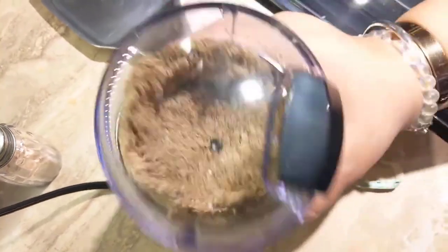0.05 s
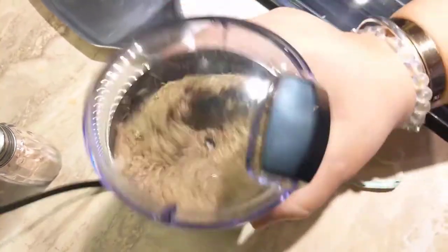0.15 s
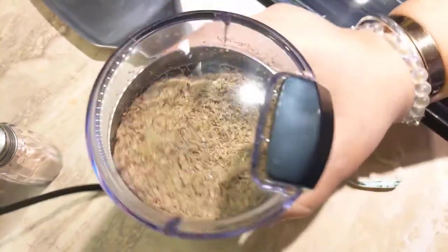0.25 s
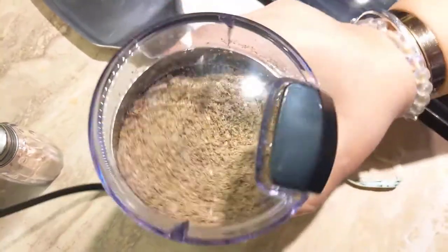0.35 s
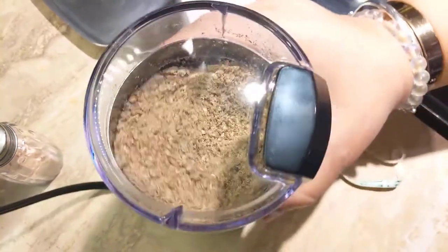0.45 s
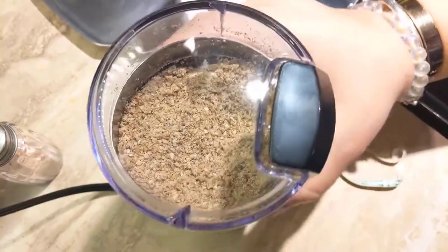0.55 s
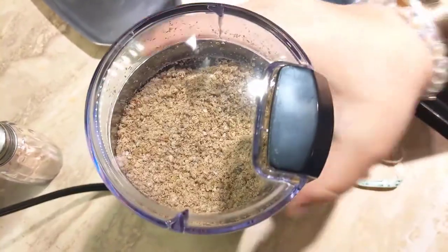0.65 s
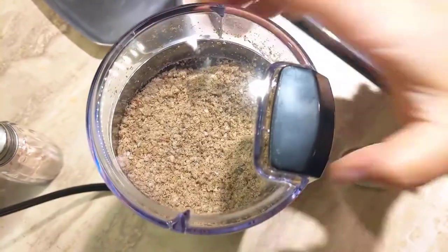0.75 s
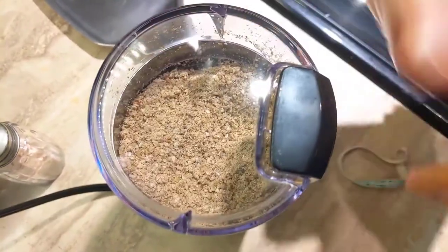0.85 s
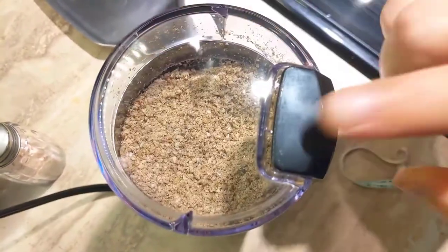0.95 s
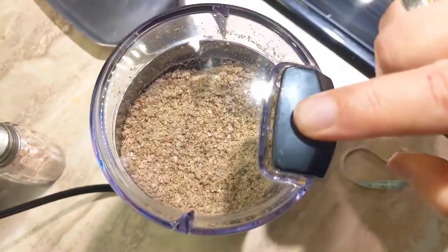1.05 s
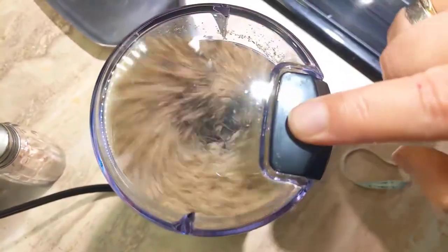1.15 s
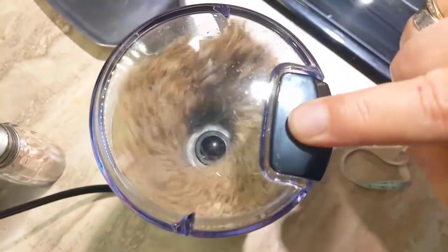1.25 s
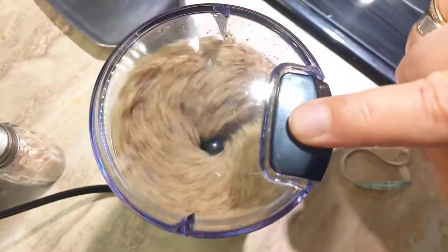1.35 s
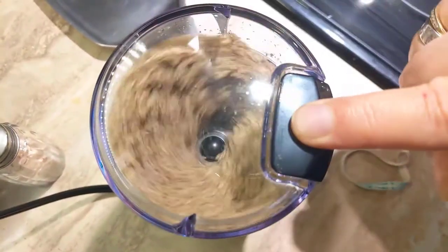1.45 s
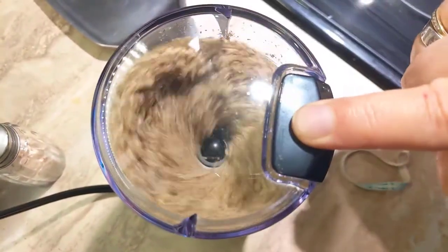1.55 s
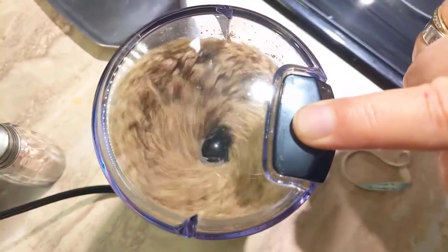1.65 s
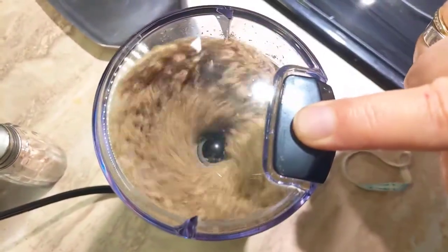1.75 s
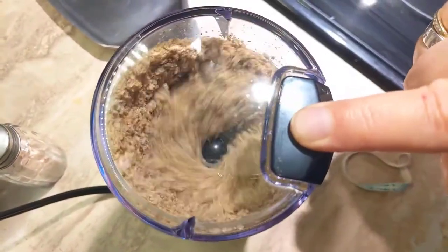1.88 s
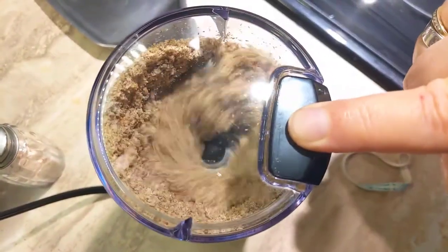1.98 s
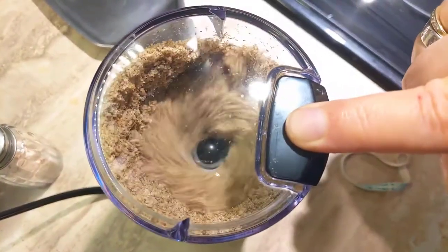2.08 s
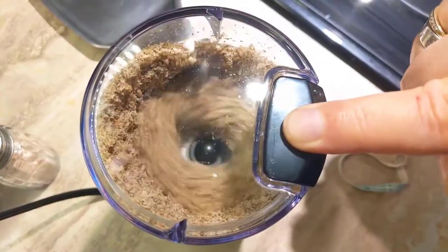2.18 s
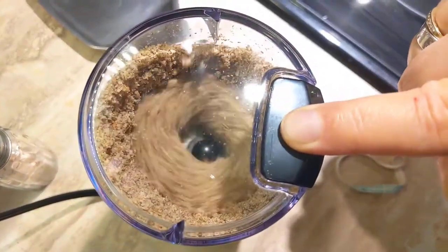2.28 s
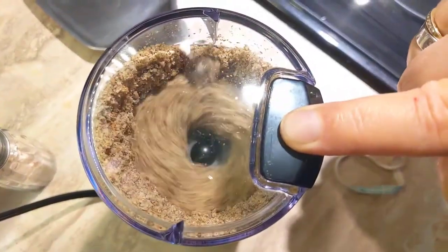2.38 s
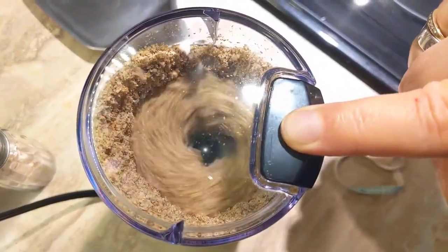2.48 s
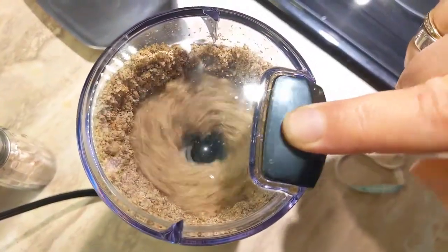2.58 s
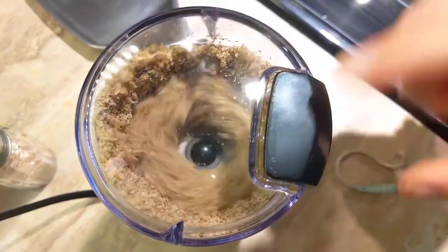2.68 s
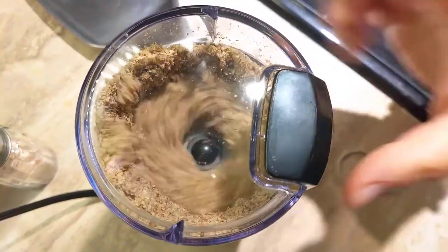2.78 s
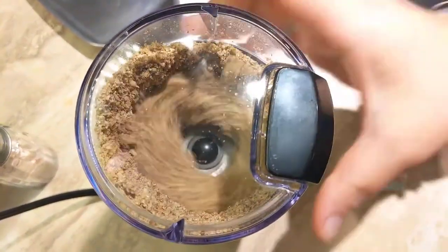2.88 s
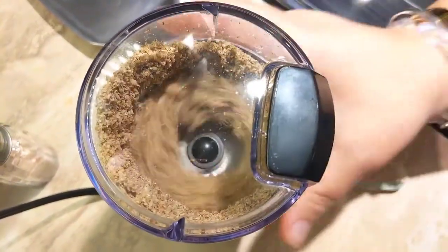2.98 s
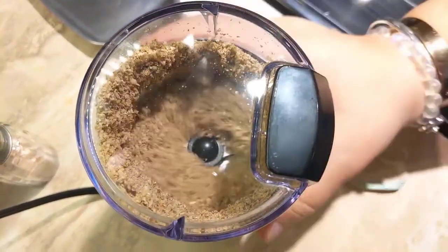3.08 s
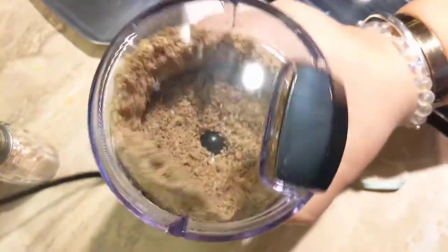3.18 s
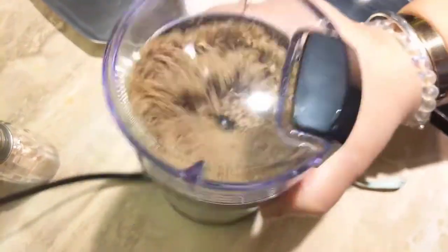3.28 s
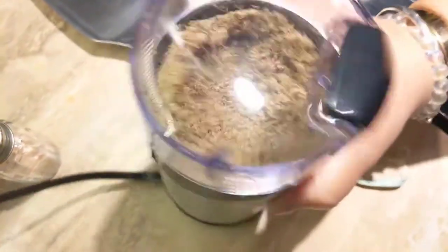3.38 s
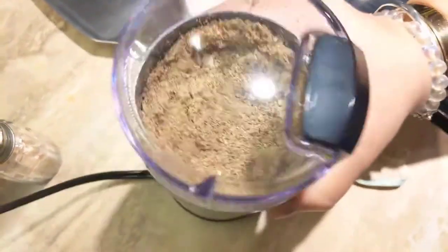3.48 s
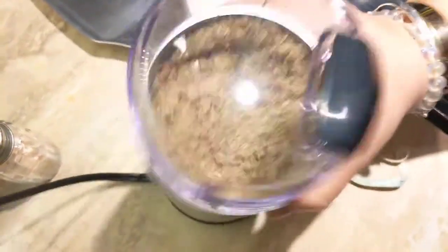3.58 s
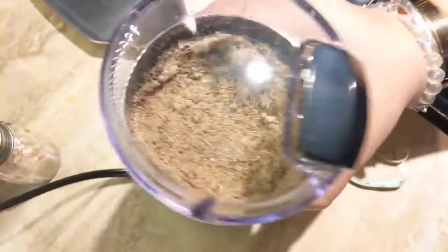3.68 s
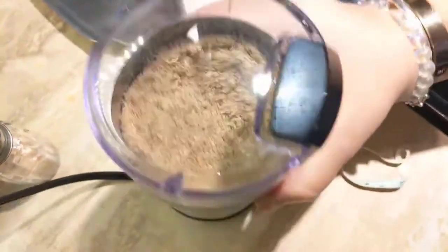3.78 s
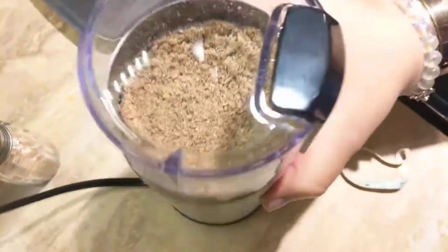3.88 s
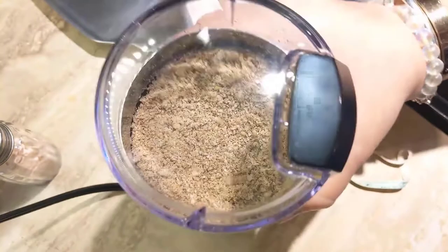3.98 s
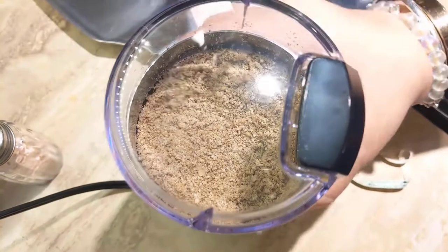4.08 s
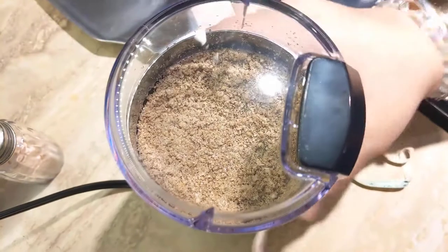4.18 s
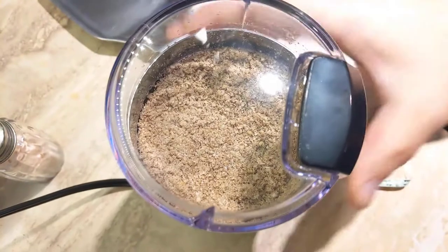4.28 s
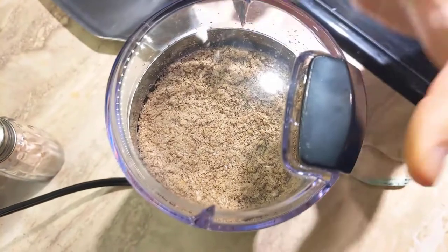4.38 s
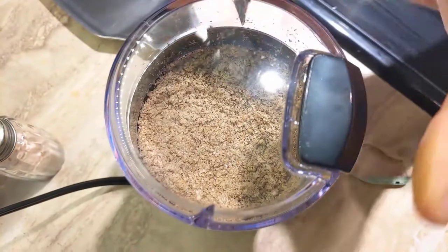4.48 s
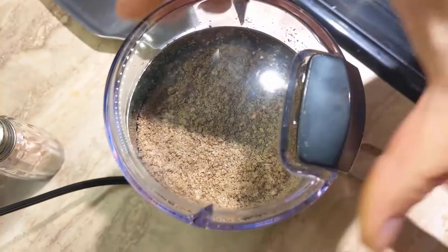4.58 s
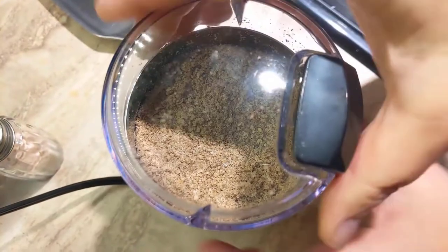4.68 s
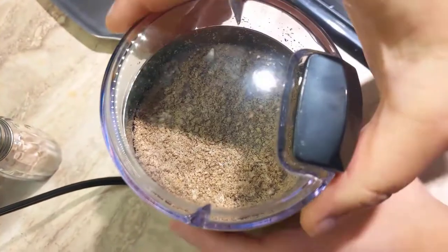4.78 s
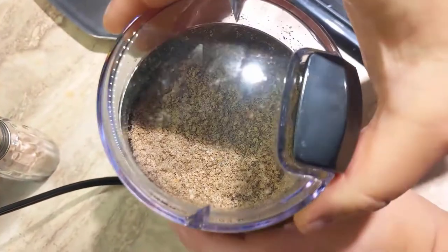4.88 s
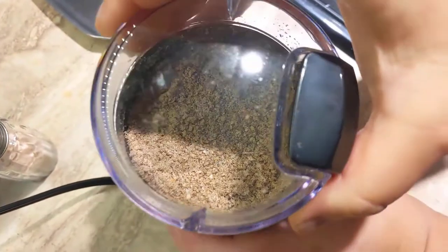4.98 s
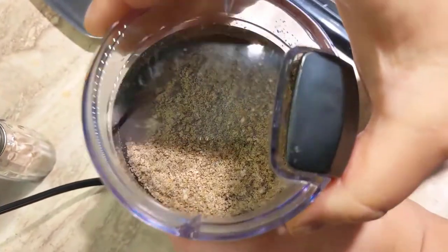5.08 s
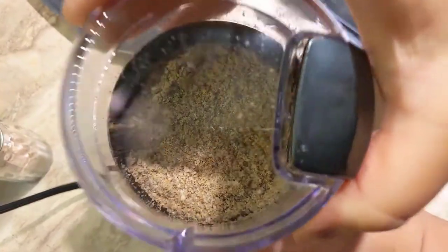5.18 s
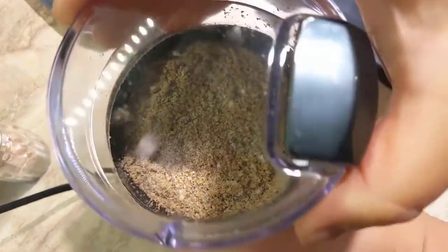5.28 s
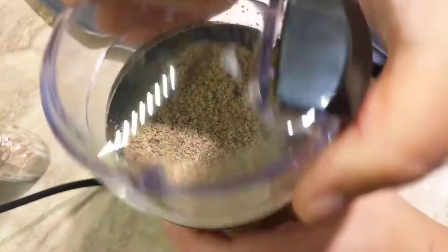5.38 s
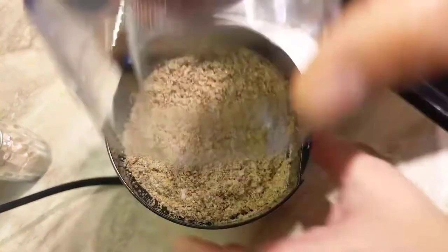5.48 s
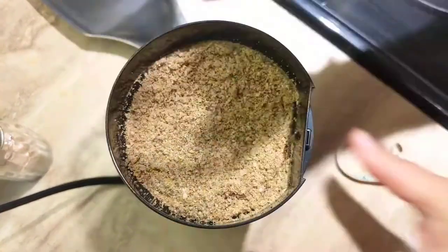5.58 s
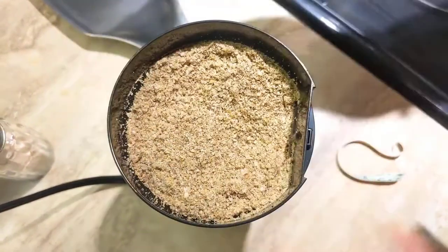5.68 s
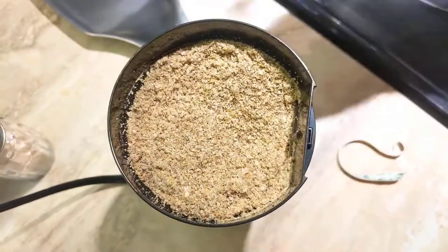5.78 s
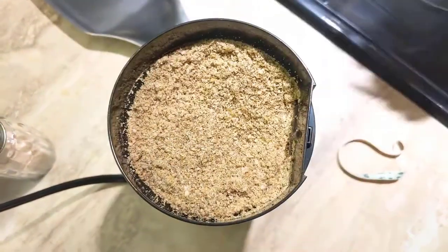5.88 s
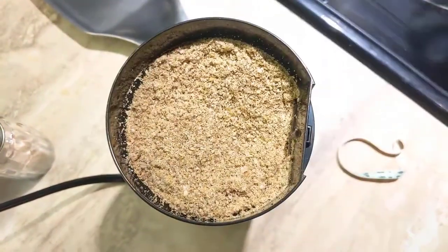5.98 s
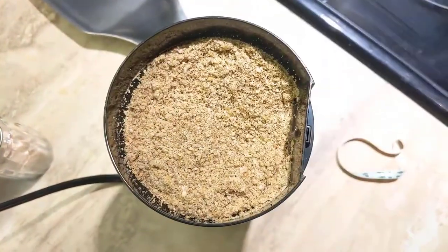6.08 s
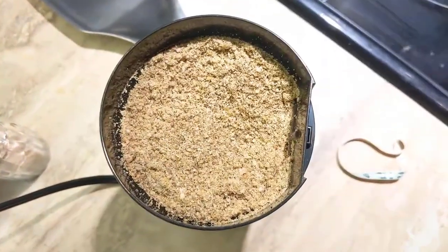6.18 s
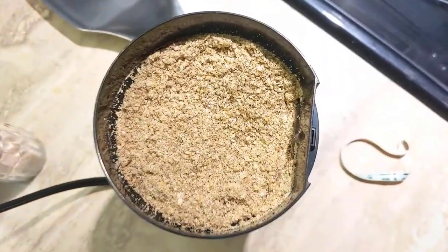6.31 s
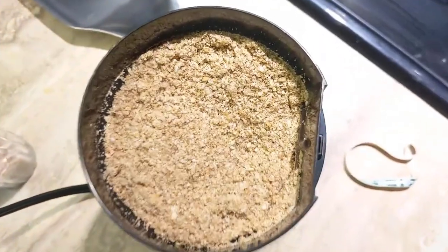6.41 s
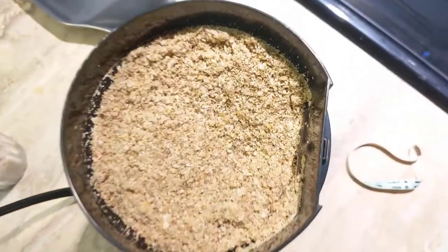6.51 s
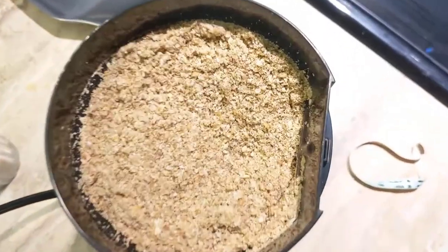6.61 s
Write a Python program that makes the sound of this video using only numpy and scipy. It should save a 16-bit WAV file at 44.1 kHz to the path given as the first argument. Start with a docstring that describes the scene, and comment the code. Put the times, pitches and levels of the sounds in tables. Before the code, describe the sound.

A handheld blade grinder, heard close in wide stereo with slight room reverberation. Its loose lid clatters and its body bumps, then the button snaps down and the motor spins up quickly, flinging dry seeds around a steel cup in a bright, harsh, rattling roar. It winds down with thin squeals, gets tipped and thumped on the counter, and the plastic lid creaks off into quiet.

```python
"""A kitchen counter, with an electric blade grinder close to a two-port microphone.
It is shaken, its lid button clicks, and the blade whirls seeds round a steel cup for two seconds and coasts down.
Then it is knocked on the counter to settle the grounds, and the plastic lid is slid off.
Sine orders and a coil buzz make the motor, coloured grains the seeds and slides, noise snaps and damped sines
the clicks and blows, and filtered noise the room tone."""
import sys
import numpy as np
from scipy import signal
from scipy.fft import rfft, irfft, next_fast_len
from scipy.io import wavfile
from scipy.ndimage import map_coordinates

SR = 44100
rng = np.random.default_rng(int(sys.argv[2]) if len(sys.argv) > 2 else 0)


def log_audio(samples):
    """Write samples as a 16-bit WAV file to the path given in sys.argv[1]."""
    # one column per channel
    frames = np.atleast_2d(samples).T
    # limit to full scale, then quantise
    limited = np.clip(frames, -1, 1)
    pcm = np.round(limited * 32767).astype(np.int16)
    wavfile.write(sys.argv[1], SR, pcm)


N = 293265
T = np.arange(N) / SR
RELEASE_S = 2.71  # the drive goes off


def amp(db):
    """Decibels to gain."""
    return 10 ** (np.asarray(db) / 20)


def evened(x):
    """Scales to an rms of one."""
    return x / np.sqrt(np.mean(x ** 2) + 1e-20)


def read(points, hz):
    """Reads a spectrum table on a log-frequency axis."""
    f, value = np.transpose(points)
    return np.interp(np.log(hz + 1), np.log(f + 1), value)


def lift(peaks, hz):
    """The dB that a set of resonances adds at hz."""
    return sum(db / (1 + (2 * (hz - at) / width) ** 2) for at, width, db in peaks)


def add(mix, s, sound):
    """Mixes a sound in at time s."""
    part = mix[..., max(round(s * SR), 0):][..., :sound.shape[-1]]
    part += sound[..., :part.shape[-1]]


def gate(on_s, off_s, edge_s=0.0074):
    """One between two moments, with soft edges."""
    return np.clip(np.minimum(T - on_s, off_s - T) / edge_s + .5, 0, 1)


def bump(s, half_s):
    """A bell-shaped swell of height one."""
    return np.exp(-((T - s) / half_s) ** 2)


def wander(hz):
    """Slow chance, up to about hz."""
    knots = rng.standard_normal(N)
    return evened(map_coordinates(knots, [T * hz + 2], order=1))


def noise(count):
    """Two unrelated white noises."""
    return rng.standard_normal((2, count))


def grains(per_s, spread_db):
    """Two trains of tiny impacts, of uneven size where spread_db is above zero."""
    size = amp(spread_db * np.minimum(rng.exponential(1, (2, N)), 4))
    sign = rng.choice([-1, 1], (2, N))
    return size * sign * (rng.random((2, N)) < per_s / SR)


def causal(db_at, size=4096):
    """The causal (minimum-phase) impulse response of a dB spectrum."""
    log_gain = np.log(amp(db_at(abs(np.fft.fftfreq(size, 1 / SR)))))
    return np.fft.ifft(np.exp(np.conj(signal.hilbert(log_gain)))).real[:size // 2]


# How alike the two close ports hear a sound. Each row: frequency in Hz, left-right likeness from 0 to 1.
PORT_LIKENESS = [(300, 0.9), (700, 0.19), (1500, 0.4), (2500, 0.56), (5000, 0.057)]


def colour(pair, spectrum, peaks=()):
    """Gives two unrelated drives a spectrum and resonances, and makes them partly alike as at the two ports."""
    count = next_fast_len(pair.shape[1])
    hz = np.fft.rfftfreq(count, 1 / SR)
    a, b = rfft(pair, count)
    same = np.clip(read(PORT_LIKENESS, hz), 0, 1)
    ports = irfft(np.array([a, same * a + np.sqrt(1 - same ** 2) * b]), count)
    ring = causal(lambda f: read(spectrum, f) + lift(peaks, f))
    return evened(signal.oaconvolve(ports, ring[None], axes=1)[:, :pair.shape[1]])


def drifting(pair, share, hz):
    """Lets all the resonances of a steady sound slide up and down together by a small share."""
    at = np.arange(N) + np.cumsum(share * wander(hz))
    return np.array([map_coordinates(port, [at], order=3, mode="mirror") for port in pair])


def modes(table, detune):
    """Damped sines of a struck object, slightly different at each blow."""
    t = T[:SR // 2]
    out = np.zeros(len(t))
    for hz, db, t60 in table:
        struck_hz = hz * (1 + detune * rng.standard_normal())
        out += amp(db - 60 * t / t60) * np.sin(2 * np.pi * struck_hz * t)
    return out


# Tone of the kitchen air. Each row: frequency in Hz, relative level in dB.
AIR_SPECTRUM = [(20, -7.5), (60, 5.5), (160, 1), (700, -8), (1100, -13.5), (2200, -22.5), (5000, -19.5),
                (7500, -28.5), (10000, -24), (15000, -37.5)]


def room_tone(level_db=-62.0):
    """Steady noise with the spectrum of the room at rest."""
    return amp(level_db) * colour(noise(N), AIR_SPECTRUM)


# Grounds slide in the moved cup and settle. Each row: start in seconds, relative level in dB, fading in dB per second.
SETTLING_SLIDES = [(0.0, -60, 39.5), (.26, -59, 46), (3.08, -59, 45), (3.74, -43, 28)]
# Tone of the sliding grounds. Each row: frequency in Hz, relative level in dB.
SLIDE_SPECTRUM = [(100, 0.5), (2300, -0.5), (5500, -7.5), (7500, -21), (15000, -29)]
# A narrow 2.3 kHz ring of the microphone port under the slides. Each row: frequency in Hz, width in Hz, lift in dB.
PORT_RING_PEAK = [(2270, 84, 5)]


def settling(level_db=-3, rise_s=0.07):
    """Many tiny grain impacts blur into a hiss that fades as the grounds come to rest."""
    level = np.zeros(N)
    for s, db, fade in SETTLING_SLIDES:
        since = np.maximum(T - s, 0)
        level += np.clip(since / rise_s, 0, 1) * amp(db - fade * since)
    return level * amp(level_db) * colour(grains(per_s=6700, spread_db=1.0), SLIDE_SPECTRUM, PORT_RING_PEAK)


# The plastic lid and its button click. Each row: start in seconds, relative snap level in dB, treble tilt in dB,
# low-middle tilt in dB, note in Hz, note peak in dB.
LID_CLICKS = [(0.0633, -39, -15, -7, 2580, -42.5), (0.1323, -44, -1, 10.5, 2510, -60),
              (0.2396, -32.5, 1.5, 5, 2280, -30), (0.2481, -26.5, -8, -1, 2210, -22.5),
              (0.2691, -31, -6, -1.5, 2100, -39), (0.69, -46, -15, 9, 2060, -44),
              (1.0675, -24, -17.5, -2.5, 2100, -21), (1.1329, -36.5, -11.5, -5.5, 2104, -22),
              (3.3099, -44.5, -30.5, 4.5, 2170, -55), (3.401, -57.5, -12, 11.5, 2010, -57),
              (3.5463, -27.5, -25, -4.5, 2470, -31.5), (3.8584, -24, -0.5, -1.5, 2370, -41),
              (3.871, -25.5, -4.5, 3.5, 2300, -28.5), (3.927, -28, -9, -6, 2260, -24.5),
              (4.027, -34.5, 2.5, 10, 2310, -32.5), (4.066, -33, -21, -13, 2400, -31),
              (4.0879, -25, -8.5, -1, 2280, -35), (4.814, -46.5, -2.5, -6, 3550, -32),
              (4.8163, -43, -6, -10, 2010, -37.5), (4.961, -44, 6, -16, 2190, -44.5),
              (5.0394, -50, 14.5, -8, 4140, -39), (5.0678, -44.5, 17.5, -12, 3840, -27),
              (6.523, -69, -9, 24.5, 1900, -69.5)]
# Tone of the plastic. Each row: frequency in Hz, relative level in dB.
PLASTIC_SPECTRUM = [(400, 6.5), (1200, 12.5), (3600, 5.5), (6000, 1.5), (10000, -6), (15000, -16)]
# Resonances of the clicking lid. Each row: frequency in Hz, width in Hz, lift in dB.
LID_PEAKS = [(2215, 130, 1.5), (3846, 900, 5)]


def clicks(swell_s=0.0019, snap_t60=0.031, rise_s=0.00099, chatter_db=-22, chatter_t60=0.093):
    """Each click is a rough snap, a few cycles of the note of the spot that is struck, and a brief chatter."""
    out, t = np.zeros((2, N)), T[:SR // 4]
    swell = (t / swell_s * np.exp(1 - t / swell_s)) ** 3
    decay = amp(-60 * t / snap_t60) + amp(chatter_db - 60 * t / chatter_t60)
    contact = (1 - np.exp(-t / rise_s)) * decay
    for s, snap_db, treble_db, low_db, hz, note_db in LID_CLICKS:
        tilt = [(900, low_db), (1800, 0), (2800, 0), (7000, treble_db)]  # (Hz, dB)
        plastic = causal(lambda f: read(PLASTIC_SPECTRUM, f) + read(tilt, f))
        drive = contact * colour(noise(len(t)), [(0, 0)], LID_PEAKS)
        snap = signal.fftconvolve(drive, plastic[None], axes=1)[:, :len(t)]
        note = swell * np.sin(2 * np.pi * hz * t)
        add(out, s, amp(snap_db) * snap + amp(note_db) * note)
    return out


# The body bumps against hand and counter. Each row: start in seconds, peak level in dB.
BODY_THUDS = [(0.127, -31.5), (0.246, -25.5), (0.378, -39), (0.5, -34.5), (3.271, -42), (3.546, -26.5),
              (3.71, -20.5), (3.76, -28.5), (3.86, -21), (4.015, -19.5), (4.086, -28.5), (4.174, -42),
              (6.522, -48.5)]
# Modes of the body. Each row: frequency in Hz, drive level in dB, decay t60 in seconds.
BODY_MODES = [(67.3, -7.5, 0.4), (90, 14, 0.066), (107.7, 8, 0.064), (152.7, -7, 0.15), (191.2, -13, 0.1),
              (373, -11, 0.054)]


def thuds(rise_s=0.018):
    """The heavy body rocks for a few cycles after each bump."""
    out = np.zeros(N)
    for s, db in BODY_THUDS:
        push = modes(BODY_MODES, detune=0.074) * (1 - np.exp(-T[:SR // 2] / rise_s))
        rock = np.gradient(push)
        add(out, s, amp(db) * rock / abs(rock).max())
    return out


def jolt_note(jolt_s=.25, level_db=-55, note_hz=2310, t60=1.2):
    """After a jolt, one long fading note near 2.3 kHz, a damped sine."""
    out = np.zeros(N)
    add(out, jolt_s, amp(level_db - 60 * T / t60) * np.sin(2 * np.pi * note_hz * T))
    return out


# Fingers brush the plastic. Each row: start in seconds, level in dB, length in seconds.
FINGER_BRUSHES = [(0.734, -56.5, 0.025), (3.231, -63.5, 0.088), (4.152, -63, 0.2), (5.495, -60.5, 0.094)]
# Bright tone of brushes and clinks. Each row: frequency in Hz, relative level in dB.
FIZZ_SPECTRUM = [(100, -31), (3000, 1), (9000, 3.5), (15000, 1.5)]


def brushes():
    """Each stroke of the fingers is a smooth swell of bright friction noise."""
    out = np.zeros((2, N))
    for s, db, length in FINGER_BRUSHES:
        stroke = np.hanning(round(length * SR))
        add(out, s, amp(db) * stroke * colour(noise(len(stroke)), FIZZ_SPECTRUM))
    return out


# The lid creaks against the cup, pressed down or pulled off. Each row: start in seconds, swell in seconds,
# note in Hz, level in dB.
LID_CREAKS = [(1.15, 0.01, 2250, -46), (4.981, 0.0028, 2010, -55), (5.1669, 0.0018, 2160, -47.5),
              (5.172, 0.0079, 4000, -44.5), (5.242, 0.0046, 3990, -51.5), (5.261, 0.0025, 2380, -50),
              (5.271, 0.003, 2270, -49), (5.283, 0.01, 2150, -51)]
# Tone of plastic scraping on steel. Each row: frequency in Hz, relative level in dB.
SCRAPE_SPECTRUM = [(100, -1), (1200, -6), (3100, -3.5), (9000, -4), (15000, -12)]


def lid_slips(width_hz=450, lift_db=19):
    """The lid sticks and slips in jerks, each a short swell of noise round one resonance."""
    out, t = np.zeros((2, N)), T[:SR // 10]
    for s, swell_s, hz, db in LID_CREAKS:
        creak = colour(noise(len(t)), SCRAPE_SPECTRUM, [(hz, width_hz, lift_db)])
        add(out, s, amp(db) * t / swell_s * np.exp(1 - t / swell_s) * creak)
    return out


# The shaft runs, shakes as grounds cake on the blade, and begins to slow. Each row: time in seconds, mean turns
# per second, relative level of the first order in dB, relative level of the upper orders in dB.
SHAFT_RUN = [(1.5, 257.8, -67.5, -50.5), (1.562, 275.8, -49, -43.5), (1.686, 284.5, -53, -44),
             (1.89, 290.2, -53, -46), (2.078, 287.5, -60, -51.5), (2.174, 286.7, -51.5, -43.5),
             (2.392, 292.5, -45.5, -46), (2.562, 297.3, -43.5, -57.5), (2.632, 302.0, -43.5, -45),
             (2.69, 298, -55, -49), (2.724, 283, -51.5, -46), (2.78, 250, -48, -49.5),
             (2.85, 217, -49, -42.5)]
START_S, SPIN_UP_BEND = 1.162, 2.4
COAST_S, COAST_BEND = 0.37, 1.35  # from the last row to rest


def shaft_speed():
    """Turns a second: the shaft spins up, runs, and is braked by friction."""
    s, speed = np.transpose(SHAFT_RUN)[:2]
    to_go = np.clip((s[0] - T) / (s[0] - START_S), 0, 1)
    coasted = np.clip((T - s[-1]) / COAST_S, 0, 1)
    return np.interp(T, s, speed) * (1 - to_go ** SPIN_UP_BEND) * (1 - coasted) ** COAST_BEND


def shaft_angle(speed, jitter=.004, stumble=.028):
    """The shaft wavers under the load of seeds, and stumbles a little in them once the drive is off."""
    waver = np.where(T < RELEASE_S, jitter, stumble)
    return 2 * np.pi * np.cumsum(speed * (1 + waver * wander(hz=59.97))) / SR


# Upper orders of the shaft. Each row: multiple of the shaft speed, relative level in dB.
UPPER_ORDERS = [(2, -4.5), (3, -1.5), (4, 2.5), (6, -1.5), (9, -0.5), (10, 7.5), (11, -15)]
# Resonances of the steel cup. Each row: frequency in Hz, width in Hz, lift in dB.
CUP_PEAKS = [(1420, 78, 6.5), (2052, 220, 7), (2440, 100, 11), (2598, 70, 9.5), (2773, 30, 11.5),
             (5304, 570, 8.5), (8680, 550, 9)]


def motor(speed, angle, shake_db=3, whine_db=2.0, coast_power=5, flutter=0.26, coast_flutter=1.2):
    """Shaft orders swell on crossing the cup's resonances, and chatter once the drive is off."""
    s, _, first_db, upper_db = np.transpose(SHAFT_RUN)
    pace = speed / speed.max()
    chatter = np.where(T < RELEASE_S, flutter, coast_flutter)
    shake = amp(shake_db + np.interp(T, s, first_db)) * pace ** 2 * np.cos(angle)
    shake *= 1 + .5 * chatter * wander(hz=46.5)
    whine = np.zeros(N)
    for k, db in UPPER_ORDERS:
        order = np.cos(round(k) * angle + 2 * np.pi * rng.random())
        whine += amp(db + lift(CUP_PEAKS, k * speed)) * order * (1 + chatter * wander(hz=44.91))
    return shake + whine * amp(whine_db + np.interp(T, s, upper_db)) * pace ** coast_power


def coil_hum(on_s=1.205, off_s=2.77, hum_hz=120, level_db=-55, inrush_db=19.5, inrush_s=0.018):
    """The field coils buzz at twice the mains frequency while current flows, hardest in the first rush."""
    rush_db = inrush_db * np.exp(-np.maximum(T - on_s, 0) / inrush_s)
    return gate(on_s, off_s) * amp(level_db + rush_db) * np.sin(2 * np.pi * hum_hz * T)


# The heap tumbles into the blade (+) or leaves it running in a hollow (-). Each row: time in seconds,
# load in dB, half length in seconds.
HEAP_TUMBLES = [(1.289, -6, 0.018), (1.327, 0, 0.005), (2.365, 3, 0.05), (2.951, 2.5, 0.025)]
BITE_DB, BITE_S = 9, 0.24  # the blade first bites into the settled heap


def blade_force(speed):
    """How hard the blade strikes: its speed times the load of seeds in its way."""
    bite_db = BITE_DB * np.exp(-np.maximum(T - START_S, 0) / BITE_S)
    load_db = bite_db + sum(db * bump(s, half_s) for s, db, half_s in HEAP_TUMBLES)
    return speed / speed.max() * amp(load_db)


# Tones of seeds, fine grit and housing under the blade. Each row: frequency in Hz, relative level in dB.
RATTLE_SPECTRUM = [(100, -57), (900, -12.5), (1700, -9.5), (2100, 0), (2550, 3), (3000, -2.5), (3800, -3),
                   (5000, -15), (8000, -17)]
GRIT_SPECTRUM = [(100, -44), (2500, -12.5), (4200, -2.5), (5600, 5), (7600, 2), (8700, 0.5), (11000, 7.5),
                 (13000, -8), (15500, -22)]
HOUSING_SPECTRUM = [(30, -61), (110, -12.5), (220, -26.5), (410, -11), (540, -18), (800, -8), (1230, -5),
                    (1500, 4.5), (1800, -6), (3000, -28)]
FLING_HZ = 55.3  # below this many turns a second the blade only stirs the seeds


def seeds(speed, angle, rattle_db=-33.5, grit_db=-46.8, housing_db=-38.5, rattle_power=1.19, grit_power=.7,
          housing_power=0.088, swirl=.24, clump_db=1.14, lurch_db=0.4):
    """The blade flings seeds at the cup, in clumps and once a turn; each layer follows its force in its own way.
    The resonances of rattle and housing drift as the heap swirls."""
    force = blade_force(speed)
    flung = speed ** 4 / (speed ** 4 + FLING_HZ ** 4)
    throw = (1 + swirl * np.cos(angle)) * amp(clump_db * wander(hz=60.2))

    hits = throw * grains(per_s=12000, spread_db=0.0)
    roar = drifting(colour(hits, RATTLE_SPECTRUM, CUP_PEAKS), share=.003, hz=14)
    rattle = amp(rattle_db) * force ** rattle_power * roar

    dust = throw * grains(per_s=16000, spread_db=7.5)
    grit = amp(grit_db) * force * (speed / speed.max()) ** grit_power
    grit = grit * colour(dust, GRIT_SPECTRUM, CUP_PEAKS)

    knocking = throw * grains(per_s=9000, spread_db=1.5)
    shell = drifting(colour(knocking, HOUSING_SPECTRUM, CUP_PEAKS), share=.012, hz=18)
    housing = amp(housing_db + lurch_db * wander(hz=24.37)) * force ** housing_power * shell
    return flung * (rattle + grit + housing)


def cup_echo(x, echo_db=-11, t60=0.045):
    """Sound bounces round inside the closed cup, which cuts the same narrow peaks into it for both ports."""
    t = T[:SR // 10]
    bounces = rng.standard_normal(len(t)) * amp(-60 * t / t60)
    wet = signal.oaconvolve(x, bounces[None] / np.linalg.norm(bounces), axes=1)[:, :N]
    return (x + amp(echo_db) * wet) / np.hypot(1, amp(echo_db))


# Hard knocks, from the kick of the starting motor and on the counter. Each row: start in seconds,
# blow level in dB, blow decay t60 in seconds, clink level in dB, relative metal ring level in dB.
HARD_KNOCKS = [(1.203, -38.5, 0.15, -59.5, -62.5), (3.579, -40, 0.063, -34.5, -40),
               (3.710, -14, 0.11, -56, -42.5), (3.7196, -20, 0.13, -39, -33)]
# Tone of the blow. Each row: frequency in Hz, relative level in dB.
BLOW_SPECTRUM = [(50, -46.5), (170, 4), (250, -12), (390, 2.5), (540, -9.5), (800, -5.5), (1300, -13.5),
                 (4000, -20.5), (7000, -26.5), (15000, -34)]
# Modes of the steel. Each row: frequency in Hz, relative level in dB, decay t60 in seconds.
STEEL_MODES = [(2510, -5.5, 0.065), (4450, -4, 0.074), (4240, -24.5, 0.27), (6750, -7.5, 0.14),
               (8000, -13.5, 0.16), (9700, -17.5, 0.28), (12700, -21, 0.12)]


def knocks(count=4, clink_t60=0.046):
    """A hard blow jars every loose part at once, clinks, and sets clusters of steel modes ringing."""
    out, t = np.zeros((2, N)), T[:SR // 2]
    for s, db, t60, clink_db, ring_db in HARD_KNOCKS:
        jar = colour(noise(len(t)), BLOW_SPECTRUM) * amp(db - 60 * t / t60)
        clink = colour(noise(len(t)), FIZZ_SPECTRUM) * amp(clink_db - 60 * t / clink_t60)
        steel = np.array([sum(modes(STEEL_MODES, detune=0.024) for _ in range(count)) for port in out])
        add(out, s, jar + clink + amp(ring_db) * steel)
    return out


# Thin squeals at the start and in the coast. Each row: loudest time in seconds, half length in seconds,
# pitch there in Hz, glide in Hz per second, relative level in dB.
THIN_SQUEALS = [(1.258, 0.013, 2850, 4998.5, -31.5), (1.34, 0.024, 2324, 2997, -39),
                (2.879, 0.095, 3050, -800, -33.5), (2.933, 0.081, 2760, 700, -34)]


def squeal(width_hz=45):
    """Narrow, fuzzy tones that swell, glide and die as the shaft speeds up or slows."""
    out = np.zeros(N)
    for s, half_s, hz, glide, db in THIN_SQUEALS:
        phase = 2 * np.pi * np.cumsum(hz + glide * (T - s)) / SR
        tone = wander(width_hz) * np.cos(phase) + wander(width_hz) * np.sin(phase)
        out += amp(db) * bump(s, half_s) * tone
    return out


# Low rumble of the moving body. Each row: frequency in Hz, relative level in dB.
SWAY_SPECTRUM = [(20, 0), (34, 10), (80, -8), (400, -69)]


def sway(at_s=3.33, half_s=0.13, level_db=-49.5):
    """The grinder is tipped and shaken, a single swell of low noise."""
    return amp(level_db) * bump(at_s, half_s) * colour(noise(N), SWAY_SPECTRUM)


# Resonances of the rubbed lid. Each row: frequency in Hz, width in Hz, lift in dB.
SQUEAK_PEAKS = [(2240, 230, 8), (3950, 220, 11.5)]


def lid_rub(start_s=4.945, end_s=5.325, start_db=-57, rise_db_per_s=6.5, stick_db=3):
    """The lid rubs up the side of the cup, harder as it goes, in uneven grains of friction, and comes free."""
    rub = gate(start_s, end_s, edge_s=0.043) * amp(start_db + rise_db_per_s * (T - start_s))
    friction = colour(grains(per_s=2400, spread_db=0.5), SCRAPE_SPECTRUM, SQUEAK_PEAKS)
    return rub * amp(stick_db * wander(hz=162.4)) * drifting(friction, share=0.018, hz=30.3)


# How long the kitchen rings. Each row: frequency in Hz, decay t60 in seconds.
KITCHEN_T60 = [(100, 0.13), (500, 1), (2200, 0.57), (6000, 0.15), (14000, 0.46)]


def kitchen(x, size=256):
    """A diffuse tail, each band dying at its own speed."""
    taps = noise(SR // 2) * (T[:SR // 2] > .005)
    hz, t, z = signal.stft(taps, SR, nperseg=size)
    decay = amp(-60 * t / read(KITCHEN_T60, hz)[:, None])
    tail = signal.istft(z * decay, SR, nperseg=size)[1]
    return signal.fftconvolve(x, tail / np.linalg.norm(tail[0]), axes=1)[:, :N]


def scene():
    """The grinder, its handling and the room."""
    speed = shaft_speed()
    angle = shaft_angle(speed)
    drive = motor(speed, angle) + coil_hum()
    grinding = cup_echo(seeds(speed, angle)) + squeal()
    blows = clicks() + thuds() + jolt_note() + knocks()
    handling = settling() + brushes() + lid_slips() + sway() + lid_rub()
    reverb = kitchen(amp(-21.0) * blows + amp(-14.0) * grinding)
    return room_tone() + drive + grinding + blows + handling + reverb


# The right port rings near 2.3 kHz. Each row: frequency in Hz, level against the left port in dB.
RIGHT_PORT_SPECTRUM = [(100, -2.5), (600, -3), (1100, -4.5), (1450, 2.5), (1850, 6), (2200, 12.5),
                       (2500, 12), (2900, 6.5), (3600, 1), (5000, -1), (6500, 0), (7600, -8), (9000, 0),
                       (14000, 1)]


def record(dry, lag_s=0.00013, edge_hz=15900):
    """Sound reaches the right port of the microphone a little later and rings in it; then the band limit."""
    late = map_coordinates(dry[1], [(T - lag_s) * SR], order=3)
    right = signal.oaconvolve(late, causal(lambda f: read(RIGHT_PORT_SPECTRUM, f)))[:N]
    low_pass = signal.firwin(511, edge_hz, window=("kaiser", 9), fs=SR)
    return signal.oaconvolve(np.array([dry[0], right]), low_pass[None], "same", axes=1)


dry = scene()
out = record(dry)
log_audio(out)
```